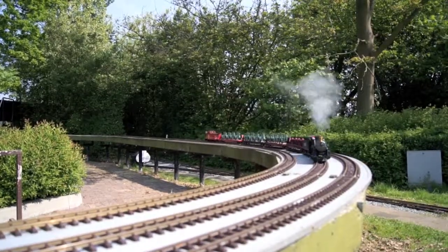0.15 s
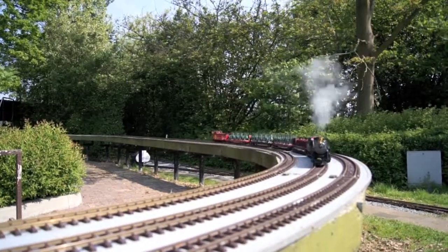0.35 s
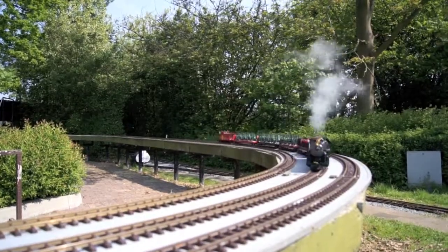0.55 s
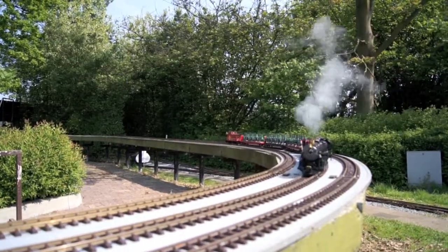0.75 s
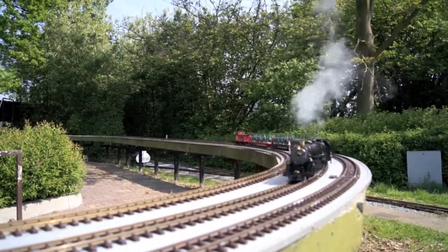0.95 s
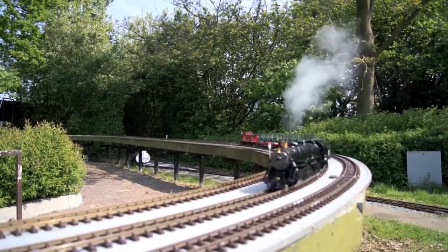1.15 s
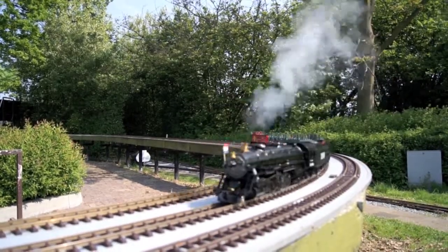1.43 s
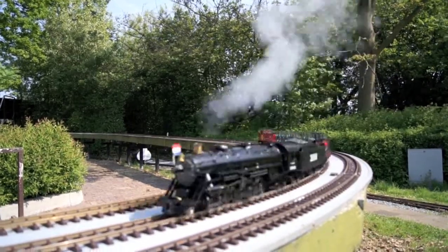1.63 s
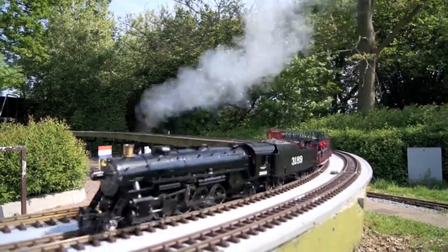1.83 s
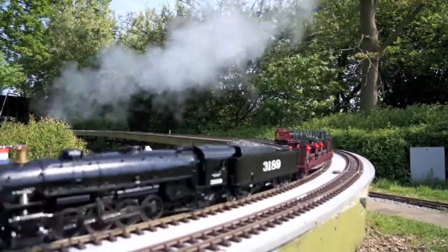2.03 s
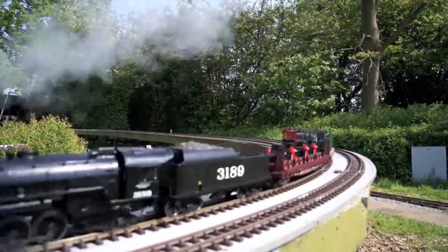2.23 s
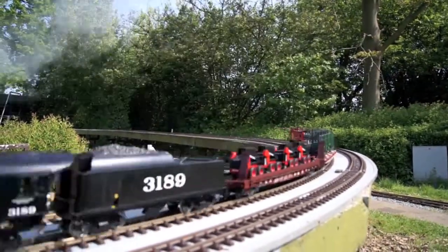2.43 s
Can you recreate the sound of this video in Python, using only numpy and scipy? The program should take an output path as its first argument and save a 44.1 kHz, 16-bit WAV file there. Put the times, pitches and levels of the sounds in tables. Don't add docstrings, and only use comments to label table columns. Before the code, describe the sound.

Fast steam exhaust beats merge into a pulsing hiss while a miniature locomotive rounds a curve

```python
import sys
import numpy as np
from scipy import signal
from scipy.io import wavfile
from scipy.ndimage import map_coordinates

SR = 44100
rng = np.random.default_rng(int(sys.argv[2]) if len(sys.argv) > 2 else 0)


def amplitude_ratio(level_db):
    exponent = np.asarray(level_db, float) / 20
    return 10 ** exponent


def digitize_waveform(pressure):
    field = np.atleast_2d(pressure).T
    bounded = np.clip(field, -1, 1)
    quanta = np.round(bounded * 32767).astype(np.int16)
    wavfile.write(sys.argv[1], SR, quanta)


N = 114660


def rms_one(x):
    return x / np.sqrt(np.mean(np.abs(x) ** 2) + 1e-20)


def in_time(rows):
    s, *columns = np.transpose(rows)
    return [np.interp(np.arange(N) / SR, s, c) for c in columns]


def at_hz(points, hz):
    table_hz, values = np.transpose(points)
    return np.interp(np.log(hz), np.log(table_hz), values)


def drift(rate_hz):
    r = np.exp(-2 * np.pi * rate_hz / SR)
    return rms_one(signal.lfilter([1], [1, -2 * r, r * r], rng.standard_normal(N + SR))[SR:])


def resonate(x, hz, width_hz):
    r = np.exp(-np.pi * width_hz / SR)
    zeros = np.array([1, 0, -1]) * (1 - r * r) / 2
    return signal.lfilter(zeros, [1, -2 * r * np.cos(2 * np.pi * hz / SR), r * r], x)


def cut(x, hz, kind, order):
    return signal.sosfilt(signal.butter(order, hz, kind, fs=SR, output="sos"), x)


def blast(bearing):
    turn_starts = np.array([-.114, .032, .178, .326, .472, .613, .758, .907, 1.057, 1.203, 1.356, 1.505,
                            1.657, 1.811, 1.963, 2.110, 2.258, 2.409, 2.560, 2.71])
    # place [share of the turn], level/dB, fall/s
    beats = [
        (-.068, .7, .033),
        (.2, 1.2, .035),
        (.445, -.3, .036),
        (.64, -.9, .03),
    ]
    rise_s, spread_db, spread_s = .0062, .6, .001
    leak_db, leak_far_db = -19, 6
    t, out = np.arange(N) / SR, np.zeros(N)
    chance = rng.standard_normal((len(turn_starts), len(beats), 2))
    for k, (start, length) in enumerate(zip(turn_starts, np.diff(turn_starts))):
        for (share, db, fall_s), (late, loud) in zip(beats, chance[k]):
            age = np.maximum(t - start - share * length - spread_s * late, 0)
            puff = (1 - np.exp(-(age / rise_s) ** 2)) * np.exp(-(age / fall_s) ** 2)
            out += amplitude_ratio(db + spread_db * loud) * puff
    return rms_one(out) + amplitude_ratio(leak_db + leak_far_db * np.maximum(bearing, 0))


def smear(flow):
    r = np.exp(-1 / (.012 * SR))
    return np.sqrt(signal.lfilter([1 - r], [1, -r], flow ** 2, zi=[r])[0])


def lagged(x, lag_s):
    at = np.arange(N) - lag_s * SR
    real = map_coordinates(x.real, [at], order=3, mode="nearest")
    imag = map_coordinates(x.imag, [at], order=3, mode="nearest")
    return real + 1j * imag


def microphone_port(direct, flow, bearing, aim_db, resonances, polarity, twists, dips):
    # f/Hz, level against the direct sound/dB
    scatter = [(500, -15), (1000, -10), (1700, -2), (2800, -8), (5300, -16), (6100, -4), (9500, -7),
               (12000, 3)]
    # f/Hz, exponent on the flow [share]
    throb_shares = [(500, .12), (1000, .3), (1900, .42), (2700, .93), (9000, .95), (13000, 1.2)]
    scatter_far_db, scatter_trim_db = 3.5, -1.5
    smeared, own = smear(flow), rng.standard_normal(N)
    out = np.zeros(N)
    for (hz, width_hz, db, lean_db, aimed), sign, (twist, swing) in zip(resonances, polarity, twists):
        throb = at_hz(throb_shares, hz)
        turned = (direct * np.exp(1j * (twist + swing * bearing))).real
        scatter_db = at_hz(scatter, hz) + scatter_far_db * bearing + scatter_trim_db
        air = turned * flow ** throb + amplitude_ratio(scatter_db) * own * smeared ** throb
        out += sign * amplitude_ratio(db + lean_db * bearing + aimed * aim_db) * resonate(air, hz, width_hz)
    for hz, width_hz, db in dips:
        out -= (1 - amplitude_ratio(db)) * resonate(out, hz, width_hz)
    return out


def locomotive():
    # t/s, level after gain control/dB, bearing [-1 left to 1 right], chimney aimed at the camera/dB
    passage = [(0, -17, .7, .1), (.4, -17, .7, .1), (.8, -17, .7, -1.1), (1.15, -17, .62, -.4),
               (1.45, -16, .42, .1), (1.75, -16, .2, 1.9), (1.95, -16, -.05, 3.0), (2.1, -17, -.35, 6.0),
               (2.22, -17, -.55, 6.0), (2.29, -17, -.7, -1.1), (2.45, -17, -.85, -3.0),
               (2.6, -17, -.95, -3.0)]
    # f/Hz, width/Hz, level/dB, lean [dB per unit bearing], share of aim
    left = [(490, 90, -19, .1, .1), (815, 150, -8.5, .1, .2), (1130, 280, -20, .1, .1),
            (2000, 550, -18, -3, .1), (2730, 350, -6.4, -4.2, .1), (3200, 450, -10, -4, .1),
            (3740, 220, 2.1, -3, .1), (4300, 700, -9.5, -2.5, .1), (5000, 600, -19, -8, -.2),
            (6250, 550, -15, -3.5, 1.2), (7200, 500, -34, .1, .1), (9250, 1000, -10.8, -4.5, .9),
            (11000, 2200, -20, -6, .2), (14900, 2200, -29, -17, -.6)]
    right = [(490, 90, -19, .1, .1), (815, 150, -9.5, .1, .2), (1130, 280, -21, .1, .1),
             (2030, 450, -20, -3.5, .1), (2730, 350, -10, -4, .1), (3200, 450, -13.5, -3.5, .1),
             (3770, 200, 1.5, 3, .1), (4720, 600, -9.5, 3, -.1), (5300, 700, -21, -2.5, .1),
             (6130, 650, -9, 5.5, .9), (7200, 400, -32, 4, .3), (9250, 800, -14.4, 5, .7),
             (10800, 1500, -34, 8, -.3), (14500, 1500, -44, .1, .1)]
    polarity = [1, 1, -1, -1, -1, 1, 1, -1, -1, 1, -1, -1, 1, -1]
    right_twists = [(-.2, .01), (-.4, -.1), (-.4, -.1), (-.4, .01), (-.3, .01), (-.1, .65), (.01, .6),
                    (.2, 1.1), (.1, .5), (3.9, -1.6), (3.7, -4.1), (3.5, -1.5), (4.1, -1.5), (2.6, .01)]
    # f/Hz, width/Hz, depth/dB
    left_dips, right_dips = [
        [(1390, 200, -9), (2370, 180, -14), (3520, 120, -4), (6900, 400, -5), (7800, 1300, -13)],
        [(1400, 250, -7), (2370, 180, -14), (4280, 250, -4), (6880, 400, -11), (7750, 1500, -16),
         (13000, 4500, -20)],
    ]
    level_db, bearing, aim_db = in_time(passage)
    flow = blast(bearing) * amplitude_ratio(.8 * drift(60))
    jet = signal.hilbert(rng.standard_normal(N))
    half_lag_s = bearing * .00013 / 2
    no_twists = np.zeros((len(left), 2))
    out = np.array([
        microphone_port(lagged(jet, half_lag_s), flow, bearing, aim_db, left, polarity, no_twists, left_dips),
        microphone_port(lagged(jet, -half_lag_s), flow, bearing, aim_db, right, polarity, right_twists,
                        right_dips)])
    out = cut(out, 300, "high", order=3)
    out = cut(out, 12000, "low", order=3)
    return amplitude_ratio(level_db) * rms_one(out)


def garden():
    # t/s, level/dB
    hum_levels = [
        (0, -59),
        (1.3, -62),
        (2.6, -67),
    ]
    hum_db, = in_time(hum_levels)
    noise = rng.standard_normal((2, N)) * [[1], [.25]]
    hum = amplitude_ratio(hum_db) * rms_one(cut(noise, [180, 400], "band", order=3))
    rumble = amplitude_ratio(-80 + 7 * drift(5.5)) * rms_one(cut(noise, 60, "low", order=2))
    common, difference = hum + rumble
    return np.array([common + difference, common - difference])


def scene():
    return locomotive() + garden()


def roll_off(x):
    return signal.sosfilt(signal.butter(12, 15280, fs=SR, output="sos"), x)


def record(dry):
    ceiling = 1.7
    rounded = ceiling * np.tanh(dry / ceiling)
    top_cut = signal.cheby2(12, 70, 16500, fs=SR, output="sos")
    return roll_off(signal.sosfilt(top_cut, rounded))


dry = scene()
out = record(dry)
digitize_waveform(out)
```